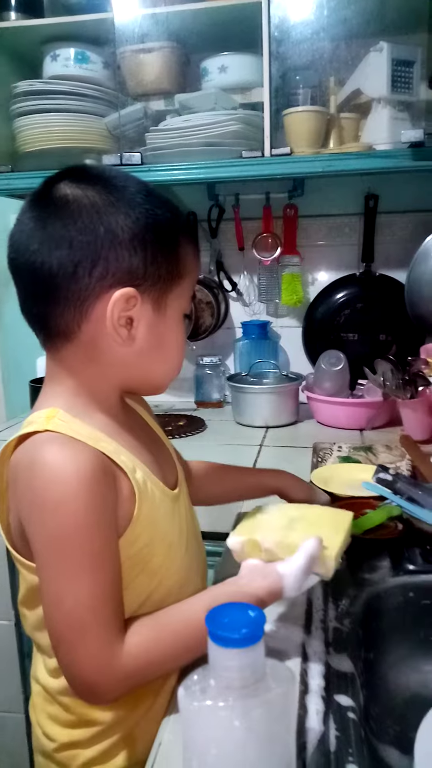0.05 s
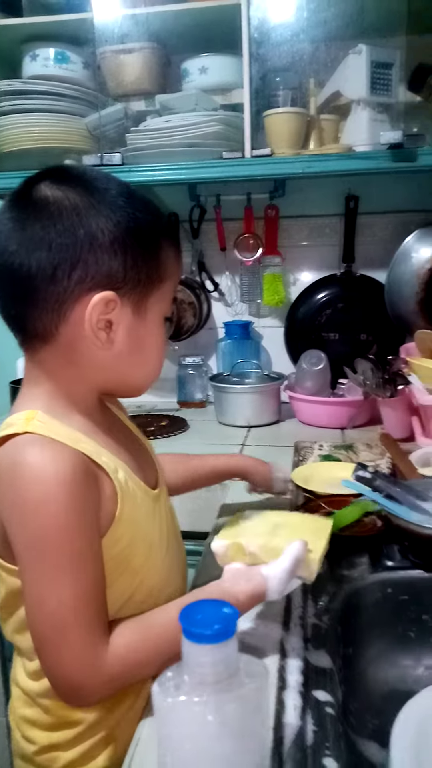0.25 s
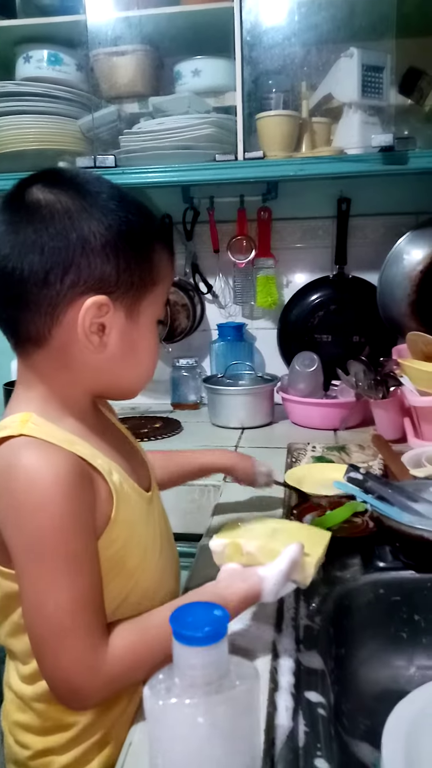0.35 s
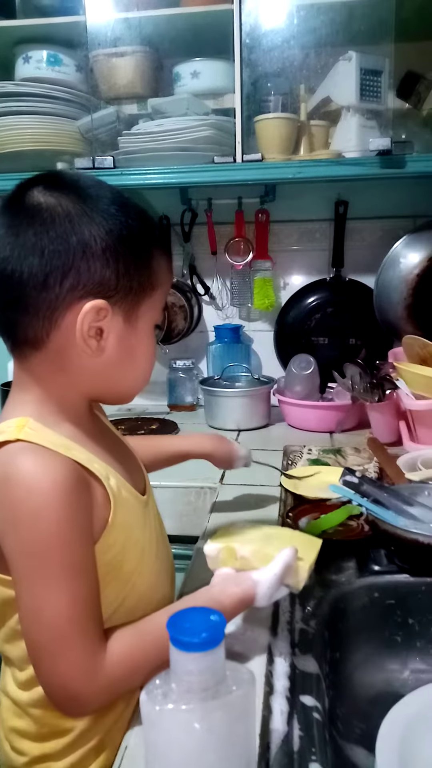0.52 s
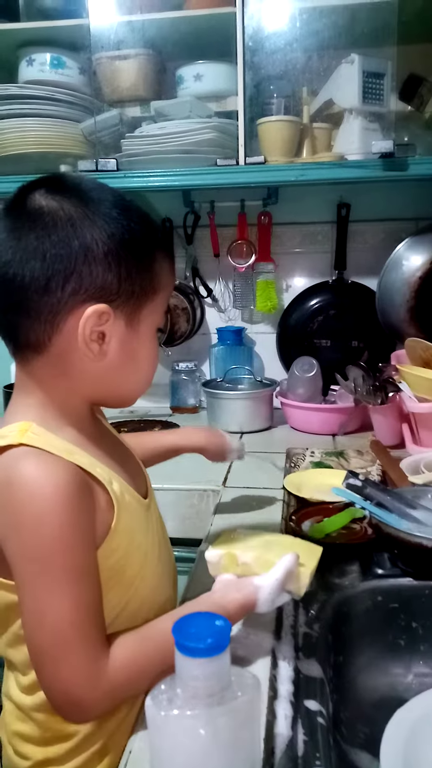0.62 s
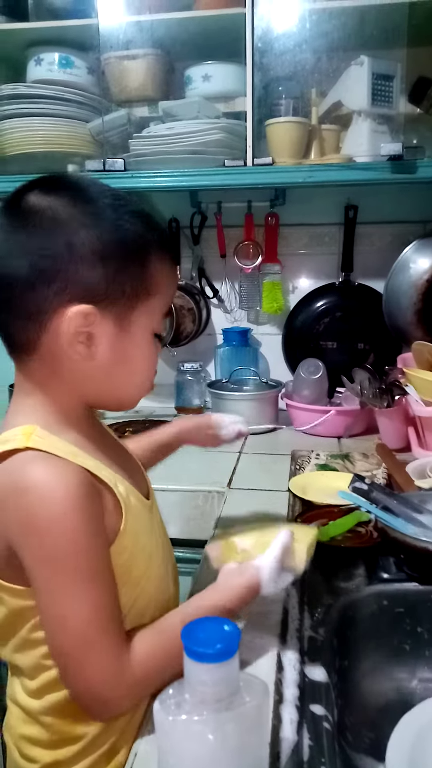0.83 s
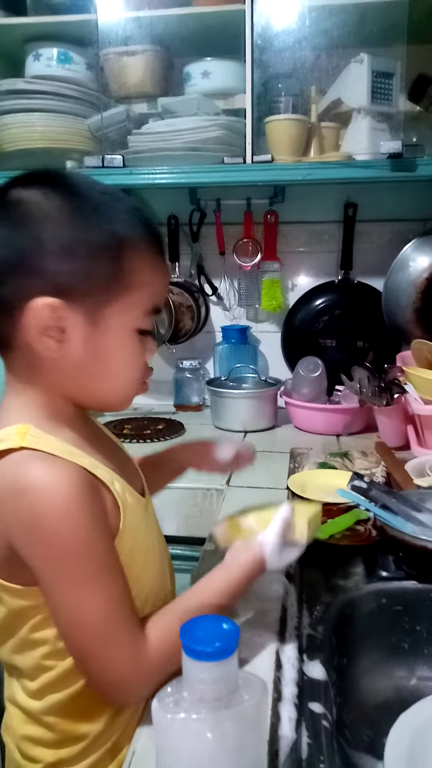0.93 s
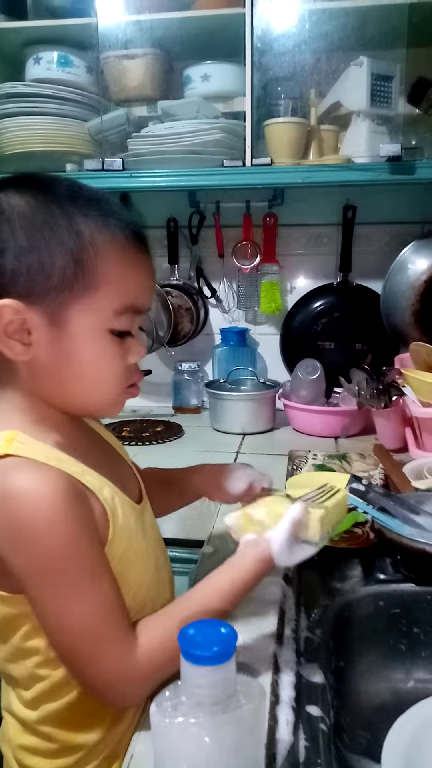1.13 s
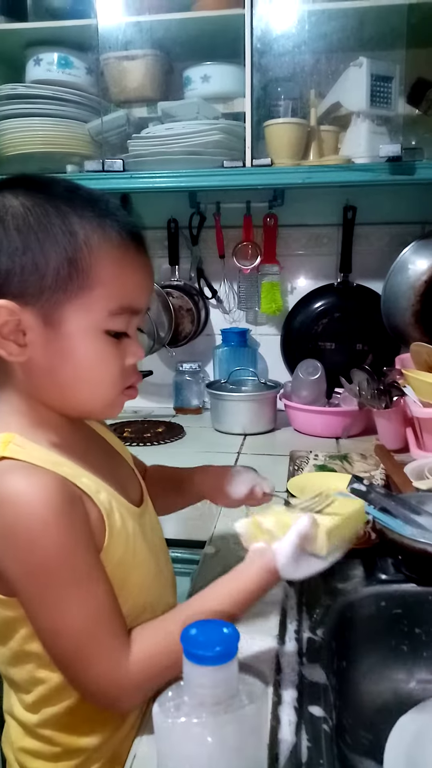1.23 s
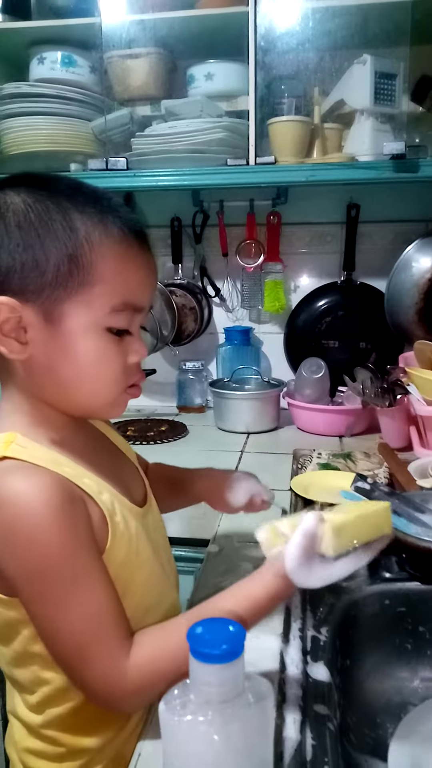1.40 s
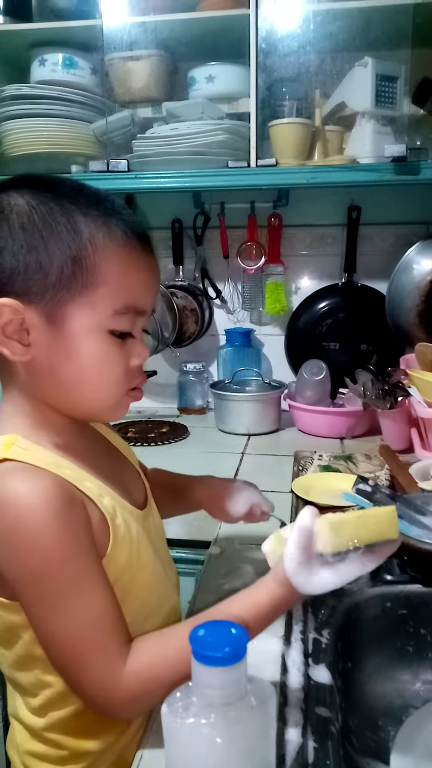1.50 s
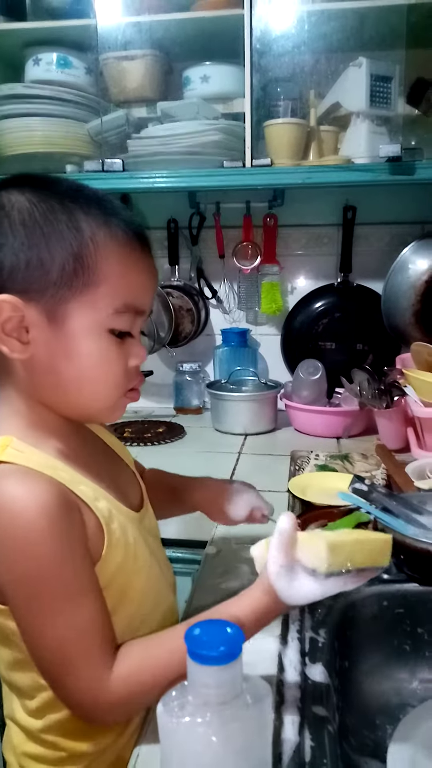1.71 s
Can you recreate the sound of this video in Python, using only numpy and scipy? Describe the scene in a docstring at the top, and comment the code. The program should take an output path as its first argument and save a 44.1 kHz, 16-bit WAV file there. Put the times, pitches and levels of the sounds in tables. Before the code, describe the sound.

Cutlery clatters on dishes in a tiled kitchen. A faint clink and small drip open over soft rustle and wet crackle. From 0.2 seconds a spoon scrapes briefly amid rapid clacks; at 0.45 a harder drop bounces with bright, short steel rings and counter thuds, settling by 0.75. Sparse, high, quiet drips tick from 0.8 to 1.66 over low rumble; a soft low rustle swells at the end.

```python
"""A spoon and a fork clack lightly on dishes in a hard-walled kitchen, then slide, drop and bounce to rest.
Each contact is a burst of gritty noise on the dishes, a noisy thud in the counter and decaying steel tones.
Two drips fall near the start and many more after the clatter, each a splash tick and a rising bubble note,
with a fine wet crackle. A soft low rustle of filtered noise is heard at the start and swells at the end.
Echoes of decaying noise make the room, over a quiet rumble."""
import sys
import numpy as np
from scipy import signal
from scipy.fft import rfft, irfft
from scipy.io import wavfile

SR = 44100
rng = np.random.default_rng(int(sys.argv[2]) if len(sys.argv) > 2 else 0)


def store_wav(level_fs):
    """Save 16-bit WAV to argv[1]."""
    pcm = np.round(np.clip(np.atleast_2d(level_fs), -1, 1) * 32767)
    wavfile.write(sys.argv[1], SR, pcm.T.astype(np.int16))


N = 77175
T = np.arange(N) / SR
HZ = np.maximum(np.arange(N + 1) * SR / (2 * N), 1)  # 1 Hz at least, so that its logarithm exists

# Contacts of cutlery with dishes; ring levels are relative:
# (start_s, clack_db, clack_tilt_db_per_octave, thud_db, spoon_db, fork_db, ring_tilt_db_per_octave)
CONTACTS = [(.001, -39.5, -0.5, -55, -52, -44, -1), (.032, -70, -2, -52.5, -74, -38, -5),
            (0.193, -58, 2, -74, -68, -41, 15), (.213, -33, 1.5, -45, -40, -56, -7),
            (.222, -35.5, 0.5, -64, -38.5, -74, 19.5), (.267, -33.5, 4.5, -32, -54, -66, -4),
            (.281, -30.5, 2.5, -36.5, -42, -44, -27.5), (.288, -27, -0.5, -31, -33.5, -43, 12.5),
            (.308, -49, -4, -50, -38, -56, 15.5), (0.32, -31, 2.5, -64, -28.5, -42, 3),
            (.338, -32, 3, -37.5, -28.5, -59, 10.5), (0.4518, -22, 2.5, -25.5, -54, -48, -5),
            (.4653, -28, 5, -32, -24.5, -20, -1.5), (0.472, -28, -4.5, -53, -37.5, -24.5, 14),
            (.497, -28.5, 0, -30.5, -25, -22.5, -7), (.505, -29, -2.5, -35, -25.5, -53, -2.5),
            (.531, -33.5, 4.5, -56, -31.5, -30, -3), (.5705, -23, .5, -41, -35, -24, -2),
            (.578, -30, 0, -46, -39, -28, 8), (.606, -39, 0, -50, -37, -46, -14),
            (0.6543, -30, 5, -38.5, -57, -24, -4), (0.664, -30.5, -3, -39.5, -47.5, -55, 21),
            (.714, -40, -3.5, -55, -44, -29.5, -6), (0.738, -65, 13, -67, -41, -67, -8)]
ATTACK_S = 0.00044
GRAIN_DB = 4  # spread of grain sizes


def from_db(db):
    """Turn decibels into a gain."""
    return 10 ** (np.asarray(db) / 20)


def at_hz(points, hz=HZ):
    """Read a (pitch_hz, value) table on a log-frequency axis."""
    point_hz, values = np.transpose(points)
    return np.interp(np.log(hz), np.log(point_hz), values)


def level(points):
    """Draw a gain over time through (time_s, level_db) points."""
    return from_db(np.interp(T, *np.transpose(points)))


def rms_one(x):
    """Scale a sound to an rms of 1, all channels together."""
    return x / np.sqrt(np.mean(x ** 2) + 1e-20)


def filtered(x, gain):
    """Multiply each frequency by its own gain."""
    return irfft(rfft(x, 2 * N) * gain)[..., :N]


def grains(spectrum, grain_db):
    """Dense tiny impacts of uneven size: noise whose strength jumps every 32 samples, coloured, rms 1."""
    steps = np.clip(rng.standard_normal(N // 32 + 1), -2.5, 2.5)
    sizes = from_db(grain_db * np.repeat(steps, 32)[:N])
    noise = rng.standard_normal(N) * sizes
    return rms_one(filtered(noise, from_db(at_hz(spectrum))))


def diffuse():
    """Sound from all around: white stereo noise, alike in the bass and nearly unrelated in the treble."""
    # Likeness of left and right: (pitch_hz, correlation from 0 to 1)
    likeness = [(100, 1), (250, 1), (500, 0.89), (1000, 0.1), (3000, 0.067), (12000, 0.033)]
    alike = np.clip(at_hz(likeness), 0, 1)
    mid, side = rng.standard_normal((2, N))
    shared = filtered(mid, np.sqrt(1 + alike))
    opposed = filtered(side, np.sqrt(1 - alike)) * np.array([[1], [-1]])
    return shared + opposed


def clicks(times, db):
    """Place one single-sample click per event."""
    out = np.zeros(N)
    places = np.clip((times * SR).astype(int), 0, N - 1)
    np.add.at(out, places, from_db(db))
    return out


def bursts(times, db, t60, attack_s=ATTACK_S):
    """Envelope of quick rises and exponential decays that add in power."""
    fall = from_db(-120 / (t60 * SR))  # power drops 60 dB in t60 seconds
    rise = np.exp(-1 / (attack_s * SR))
    power = signal.lfilter([1], [1, -fall], clicks(times, 2 * db) + 1e-18)
    return np.sqrt(signal.lfilter([1 - rise], [1, -rise], power))


def ring(force, hz, t60):
    """A resonator: a unit click sets a decaying sine of height 1 ringing."""
    decay = from_db(-60 / (t60 * SR))
    turn = 2 * np.pi * hz / SR  # radians per sample
    return signal.lfilter([0, np.sin(turn)], [1, -2 * decay * np.cos(turn), decay * decay], force + 1e-18)


def octaves(x):
    """Split a sound into overlapping octave bands: (centre_hz, band)."""
    centres = 125 * 2. ** np.arange(8)
    spectrum = rfft(x, 2 * N)
    bands = []
    for hz, share in zip(centres, np.eye(len(centres))):
        gain = np.interp(np.log(HZ), np.log(centres), share)
        bands.append((hz, irfft(spectrum * gain)[..., :N]))
    return bands


def dishes():
    """Each contact gives a gritty clack, a dull plate ring and a counter thud; the slide rubs a low rasp."""
    # Colours of the clack and of the counter thud: (pitch_hz, relative_level_db)
    clack_spectrum = [(50, -40), (150, -27), (400, 4.5), (800, 4), (1400, 3), (2300, -3), (3200, 1.5),
                      (4400, 2), (7000, 2.5), (9500, -5), (11500, -14), (13300, -15), (14700, -3.5),
                      (16000, -14)]
    thud_spectrum = [(25, -38), (65, -56), (95, -7), (130, 6.5), (280, 4), (420, -2.5), (900, -25),
                     (3000, -33)]
    # Ringing tones of the plate: (pitch_hz, level_against_clack_db, t60_s)
    plate_modes = [(291.5, -18.5, 0.3), (477, -26, 0.14), (775, -20, 0.091), (1256, -25, .06),
                   (1678, -13.5, 0.076)]
    # Friction of the spoon sliding on a dish: (time_s, level_db), and its colour: (pitch_hz, relative_level_db)
    slide_level = [(.2, -60.5), (.222, -37.5), (.26, -45.5), (.29, -40), (.345, -47), (.38, -68),
                   (.42, -81)]
    slide_spectrum = [(60, -43), (120, -7.5), (290, -4), (420, -18.5), (1550, -25), (1730, -4), (1810, 0),
                      (2000, -24.5), (8000, -75)]
    clack_t60_s, thud_t60_s = 0.084, 0.079

    start_s, clack_db, tilt, thud_db = np.transpose(CONTACTS)[:4]
    clack = 0
    for hz, band in octaves(grains(clack_spectrum, GRAIN_DB)):
        band_db = clack_db + tilt * np.log2(hz / 3000)
        clack = clack + band * bursts(start_s, band_db, clack_t60_s)
    plate = sum(ring(clicks(start_s, clack_db + db), hz, t60) for hz, db, t60 in plate_modes)
    thud = grains(thud_spectrum, GRAIN_DB) * bursts(start_s, thud_db, thud_t60_s)
    slide = level(slide_level) * grains(slide_spectrum, GRAIN_DB)
    return clack + plate + thud + slide


def cutlery():
    """Contacts ring spoon and fork: decaying steel tones, slightly blurred in pitch, with phase
    drifting at random, separately left and right."""
    # Ringing tones of the steel: (pitch_hz, relative_level_db, t60_s)
    spoon_modes = [(1745, -21, .06), (3697, -1, .09), (3765, -5, .06), (5222, -15, .06), (5849, -5, .09),
                   (5880, -3, .09), (5966, -8, .07), (6740, -2, .08), (8285, -9, .07), (8335, -5, .08),
                   (10060, -16, .08), (11130, -23, .08), (14260, -15, .08), (15150, -15, .06)]
    fork_modes = [(4148, -8, .07), (4235, -5, .05), (4265, 0, .07), (6695, -3, .09), (6819, -9, .07),
                  (6904, -12, .07), (12065, -24, .1)]
    ring_db, ring_width_hz, ring_attack_s = 3.5, 13.8, 0.00081  # the width sets how fast the phase drifts

    start_s, _, _, _, spoon_db, fork_db, tilt = np.transpose(CONTACTS)
    out = np.zeros((2, N))
    for modes, contact_db in ((spoon_modes, spoon_db), (fork_modes, fork_db)):
        for hz, db, t60 in modes:
            tilt_db = tilt * np.clip(np.log2(hz / 5000), -.6, .8)
            strength_db = ring_db + contact_db + db + tilt_db
            steps = rng.standard_normal((2, N)) * np.sqrt(2 * np.pi * ring_width_hz / SR)
            drift = np.cumsum(steps, axis=1)
            tone = np.sin(2 * np.pi * hz * T + drift)
            out += bursts(start_s, strength_db, t60, ring_attack_s) * tone
    return out


def drips():
    """Each drip is a splash tick and a short bubble note that rises in pitch; suds crackle underneath."""
    # Drips: (start_s, bubble_start_hz, bubble_db, tick_db)
    drip_events = [(0.084, 2650, -34.5, -33), (.088, 1530, -45, -54), (0.8152, 8560, -30.5, -42.5),
                   (.849, 2690, -43, -62), (.861, 15000, -22.5, -46), (0.871, 6700, -28.5, -39.5),
                   (0.89, 1176, -51.5, -54), (.928, 5230, -31, -57), (0.9604, 6560, -42.5, -39.5),
                   (0.967, 1274, -43.5, -66), (1.024, 11000, -49, -34.5), (1.033, 4150, -58, -60),
                   (1.064, 6550, -31.5, -42.5), (1.078, 1880, -46, -51.5), (1.097, 7600, -36.5, -45.5),
                   (1.215, 5880, -44, -51.5), (1.2795, 2310, -51.5, -51.5), (1.282, 5300, -38.5, -48.5),
                   (1.294, 4140, -44, -49.5), (1.3713, 5900, -42, -56), (1.3991, 6650, -32, -40),
                   (1.403, 3980, -41.5, -66), (1.453, 2740, -40, -46), (1.454, 1610, -50, -53),
                   (1.458, 5170, -31, -65), (1.474, 3880, -36, -71), (1.4913, 6350, -28.5, -46),
                   (1.5192, 5530, -41, -70), (1.535, 4160, -33.5, -45), (1.544, 2570, -49, -45),
                   (1.569, 5150, -38, -68), (1.5995, 3920, -39, -47.5), (1.6615, 4780, -38.5, -46)]
    # Colour of ticks and suds: (pitch_hz, relative_level_db)
    tick_spectrum = [(60, -31), (500, -40), (1500, -9), (2600, -5), (3350, -8.5), (4200, 0), (6500, 2),
                     (9500, -3.5), (12500, -16), (15000, -3.5)]
    # Loudness of the fine wet crackle: (time_s, level_db)
    suds_level = [(0, -45), (.1, -52.5), (.2, -45.5), (.45, -85), (.8, -58.5), (.9, -55.5), (1.08, -61),
                  (1.16, -66), (1.4, -76), (1.55, -66), (1.65, -65), (1.75, -88)]
    suds_grain_db = 2.5
    tick_t60_s = 0.025
    tick_tilt_db = 4  # higher bubbles tick brighter: dB per octave, for each octave of bubble pitch
    bubble_cycles = 42.4  # cycles of the starting pitch in which a bubble fades 60 dB
    bubble_rise_per_s = 4  # pitch rise, as a share of the starting pitch

    start_s, pitch_hz, _, tick_db = np.transpose(drip_events)
    tilt = tick_tilt_db * np.log2(pitch_hz / 5000)
    ticks = 0
    for hz, band in octaves(grains(tick_spectrum, GRAIN_DB)):
        band_db = tick_db + tilt * np.log2(hz / 6000)
        ticks = ticks + band * bursts(start_s, band_db, tick_t60_s)

    bubbles = np.zeros(N)
    for start, hz, db, _ in drip_events:
        age = np.maximum(T - start, 0)
        fade = from_db(db - 60 * age * hz / bubble_cycles)
        onset = 1 - np.exp(-2 * age / ATTACK_S)
        cycles = hz * age * (1 + bubble_rise_per_s * age / 2)
        bubbles += fade * onset * np.sin(2 * np.pi * cycles)
    return ticks + bubbles + level(suds_level) * grains(tick_spectrum, suds_grain_db)


def rustle():
    """A soft low rustle: coloured stereo noise that swells and sinks."""
    # Loudness: (time_s, level_db), and colour: (pitch_hz, relative_level_db)
    rustle_level = [(0, -51.5), (.12, -52.5), (.2, -47.5), (.42, -82), (.85, -73), (1.25, -83),
                    (1.6, -68.5), (1.68, -52.5), (1.75, -53.5)]
    rustle_spectrum = [(60, -39), (130, -3), (300, -4), (550, -9), (1200, -19.5), (2200, -12.5),
                       (3500, -23.5), (9000, -35)]
    return level(rustle_level) * rms_one(filtered(diffuse(), from_db(at_hz(rustle_spectrum))))


def rumble():
    """The room's quiet rumble: steady stereo noise, strongest in the bass."""
    # Colour: (pitch_hz, relative_level_db)
    rumble_spectrum = [(25, -6), (65, 3), (100, 0), (135, 8), (200, -8), (330, -1), (600, -13), (2000, -30),
                       (8000, -17.5), (16000, -47)]
    rumble_db = -63
    return from_db(rumble_db) * rms_one(filtered(diffuse(), from_db(at_hz(rumble_spectrum))))


def kitchen():
    """Echoes of the tiled room: stereo noise dying away, the top treble fastest; average energy 1 a side."""
    # Time for echoes to fade 60 dB: (pitch_hz, t60_s)
    room_t60 = [(125, 0.32), (700, 0.36), (2000, 0.38), (4000, 0.32), (8000, 0.27), (15000, 0.21)]
    first_echo_s = 0.0014
    tail = sum(band * from_db(-60 * T / at_hz(room_t60, hz)) for hz, band in octaves(diffuse()))
    fade_in = np.clip(T / first_echo_s - .5, 0, 1)
    return rms_one(tail * fade_in) / np.sqrt(N)


def scene():
    """Add the direct sounds, their echoes, the rustle and the rumble."""
    room = kitchen()
    direct_db = -2.5
    sources = ((dishes(), .5), (cutlery(), -5), (drips(), -2))  # (sound, level sent into the room in dB)
    direct = from_db(direct_db) * sum(sound for sound, _ in sources)
    sent = sum(sound * from_db(db) for sound, db in sources)
    echoes = signal.fftconvolve(sent, room, axes=1)[:, :N]
    return direct + echoes + rustle() + rumble()


def record(dry):
    """The left port is shaded and hears earlier; deep bass is weakened and the extreme top cut."""
    # Shading of the left port: (pitch_hz, gain_db)
    left_shade = [(100, -5), (500, -7.5), (2000, -1.5), (4000, -4.5), (7000, -8.5), (10000, -6),
                  (12500, -23.5), (15000, -23.5)]
    right_lag_s = 0.000832
    low_cut_hz, low_leak_db = 97, -12  # the leak lets some deep bass through
    top_cut_hz = 15600

    left = filtered(dry[0], from_db(at_hz(left_shade)))
    right = filtered(dry[1], np.exp(-2j * np.pi * HZ * right_lag_s))  # a pure delay
    both = np.array([left, right])
    low_cut = signal.butter(8, low_cut_hz, "high", fs=SR, output="sos")
    both = signal.sosfilt(low_cut, both) + from_db(low_leak_db) * both
    top_cut = signal.ellip(12, .2, 80, top_cut_hz, fs=SR, output="sos")
    return signal.sosfilt(top_cut, both)


dry = scene()
out = record(dry)
store_wav(out)
```